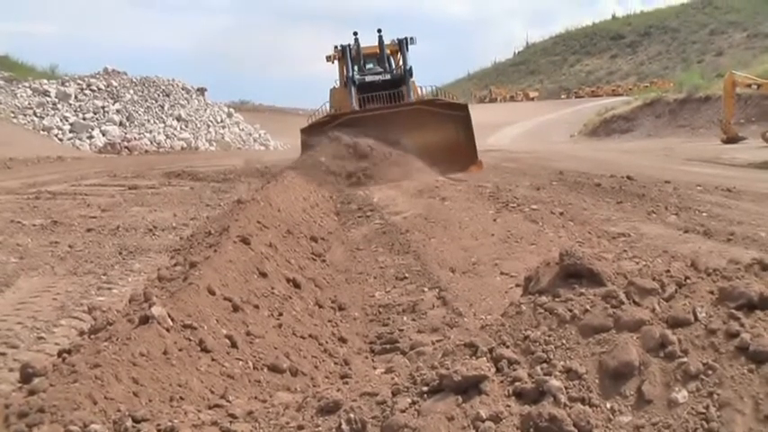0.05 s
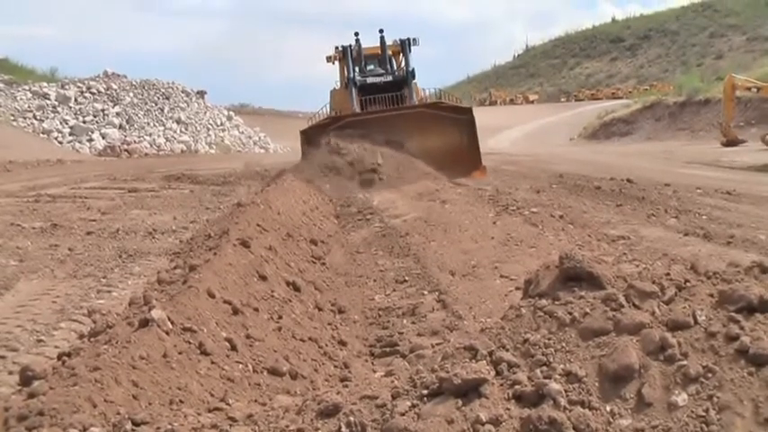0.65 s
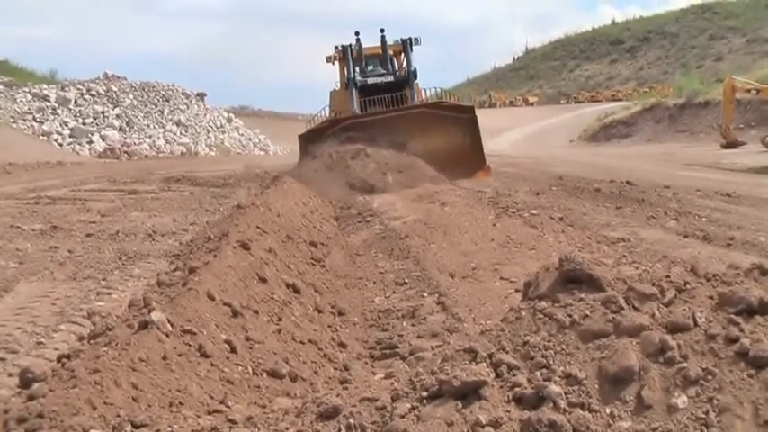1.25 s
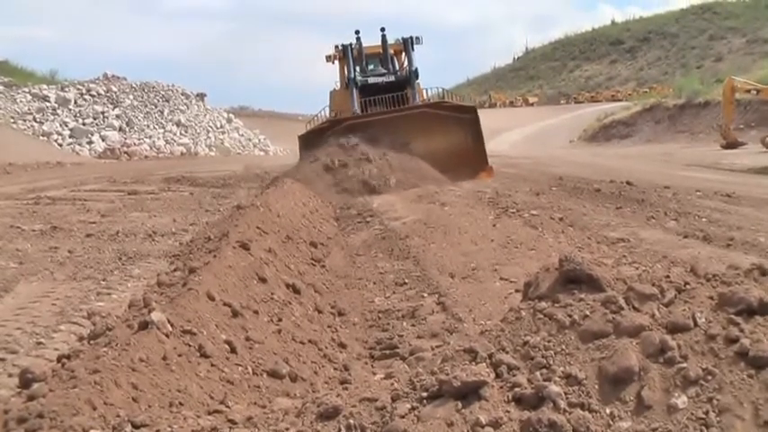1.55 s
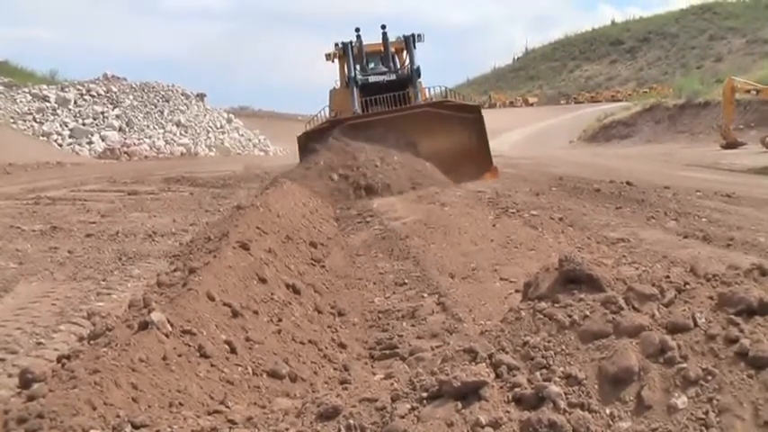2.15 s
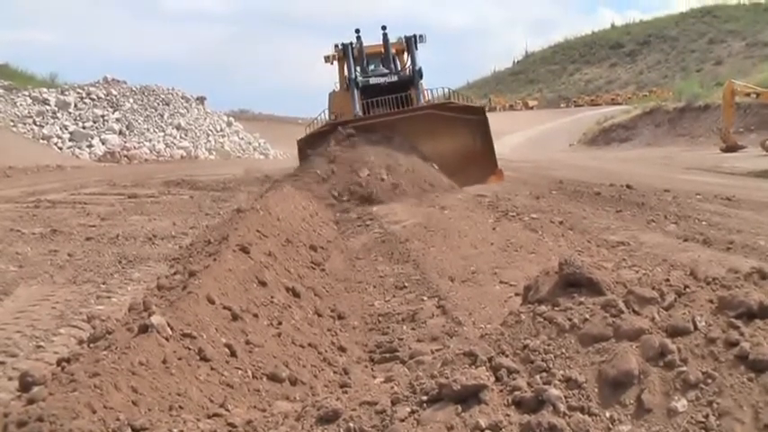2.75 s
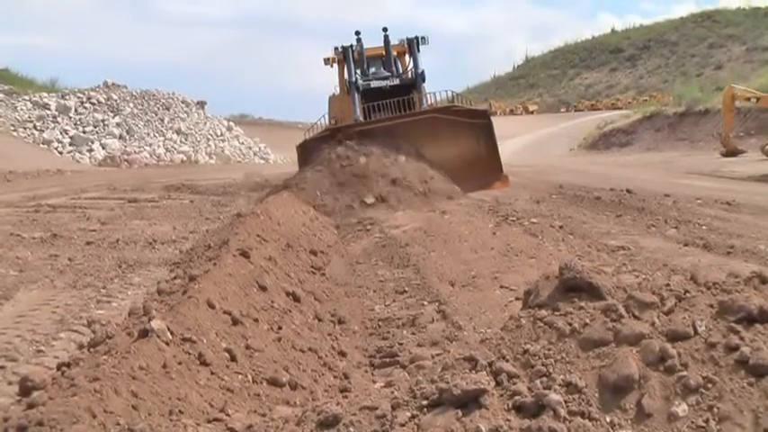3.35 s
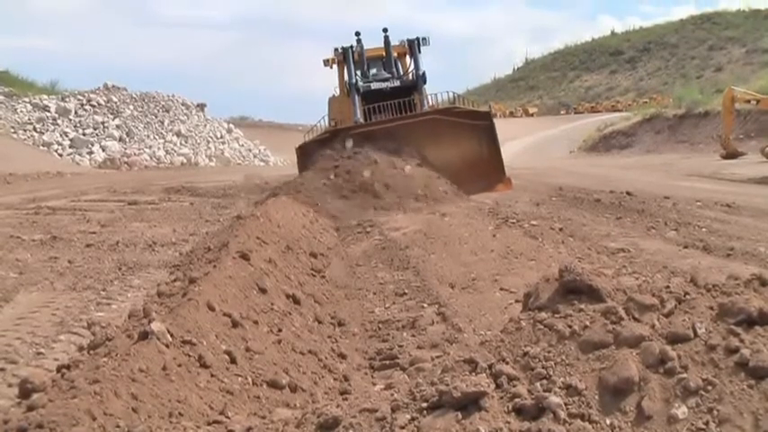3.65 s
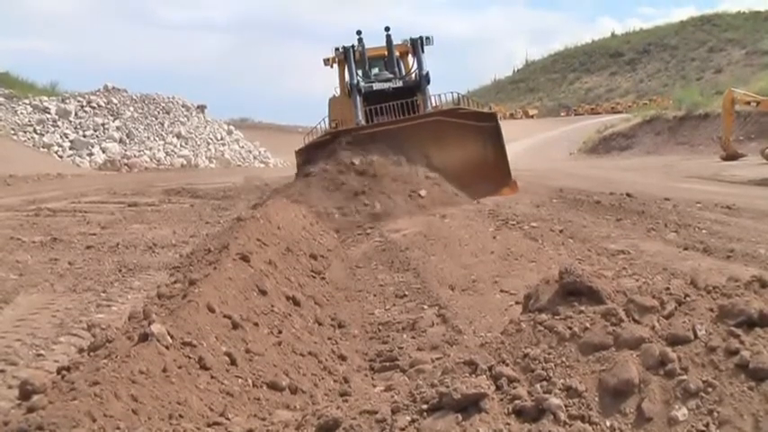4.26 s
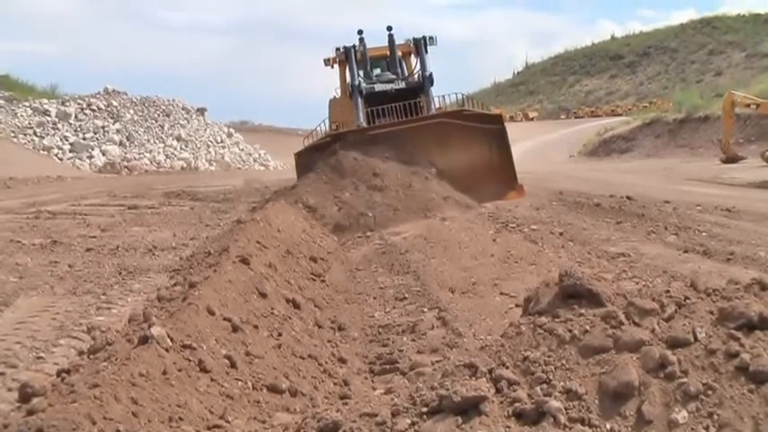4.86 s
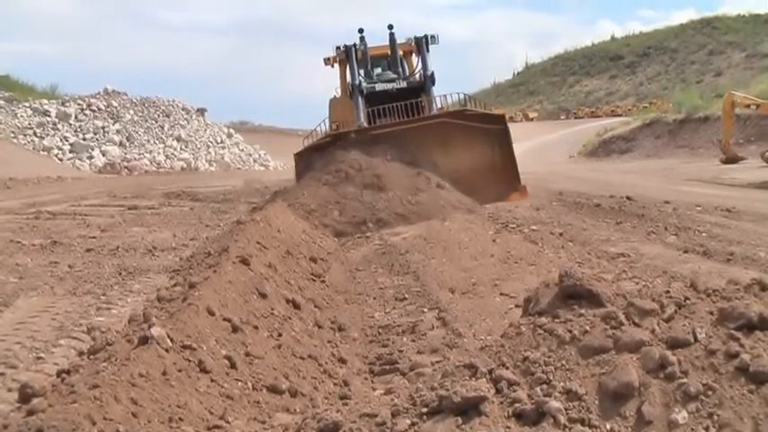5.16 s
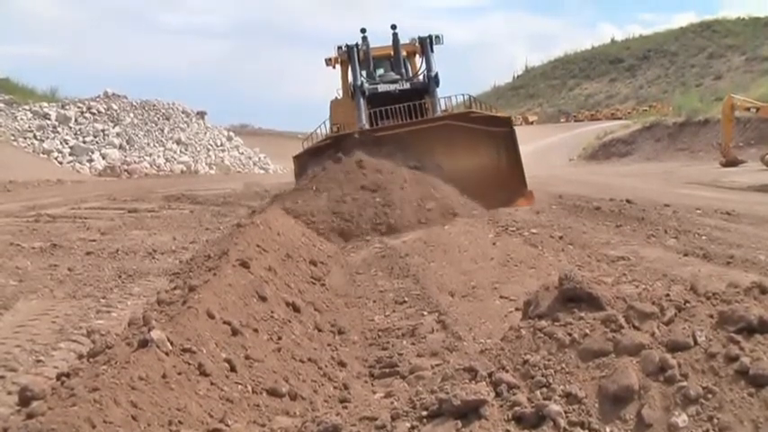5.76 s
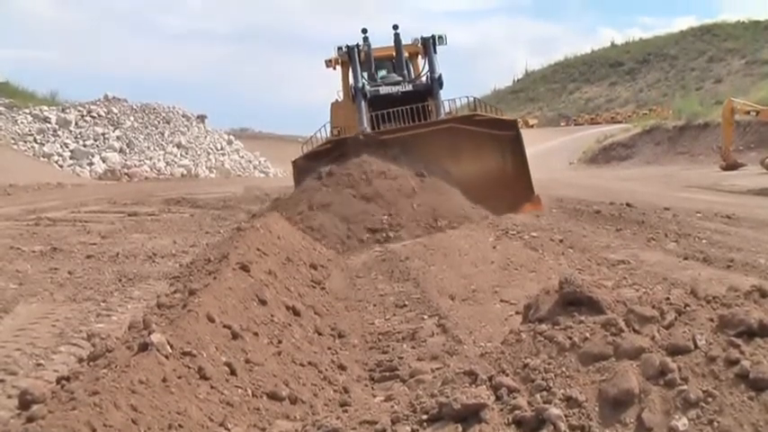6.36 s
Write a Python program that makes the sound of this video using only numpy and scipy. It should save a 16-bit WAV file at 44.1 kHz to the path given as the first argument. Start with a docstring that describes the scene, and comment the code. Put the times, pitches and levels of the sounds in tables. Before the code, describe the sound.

A bulldozer works outdoors, its diesel engine giving a throbbing roar with a fan hum and a faint, high turbo whistle that wavers slightly downward. Steel tracks rattle in quick surges while soil hisses and gravel crunches on the blade. The first second is loud and loaded, with track clanks and short stone knocks. From about 1 to 2.5 seconds, wind flutters and pops hollowly on the microphone and the machine recedes. More clanks come around 2.6 seconds, and the engine swells near 3 seconds with a brief steel ring. Gusts return just after 3 seconds and from about 3.7 to 4.8, over a weaker engine and scattered clanks and scrapes. From 5 to 5.9 seconds the engine is strong again, stones rasp along the blade and track pins squeak briefly. A last gust covers the machine from about 6 seconds.

```python
"""A crawler bulldozer's diesel drones as it pushes soil; its sound fades under the gusts and comes back
between them. Periodic firing gives a throbbing roar and harmonics; the fan hums, the turbo whistles.
Impacts excite the modes of the steel tracks, dry pins squeak, and soil and stones scrape and knock
on the blade. Gusts buffet the microphone, whose low cut leaves a hollow flutter of them."""
import sys
import numpy as np
from scipy import signal
from scipy.fft import rfft, irfft
from scipy.io import wavfile
from scipy.ndimage import uniform_filter1d

SR = 44100
rng = np.random.default_rng(int(sys.argv[2]) if len(sys.argv) > 2 else 0)


def generate_wav(sig):
    """Save sig (samples, or channels by samples) to the path in sys.argv[1] as 16-bit PCM at SR."""
    pcm = np.round(np.clip(np.atleast_2d(sig).T, -1, 1) * 32767).astype(np.int16)
    wavfile.write(sys.argv[1], SR, pcm)


N = 282240
TIME = np.arange(N) / SR

# spectrum of the engine's roar: (frequency [Hz], relative density [dB])
ROAR_SPECTRUM = [(30, -70), (50, -51), (70, -54), (100, -11), (200, -13), (320, -10), (480, 0.5),
                 (750, 1.5), (1100, -3), (1600, -2.5), (2150, -0.5), (2700, -6), (3500, -7), (4500, -24.5),
                 (7000, -69)]
# engine orders: (multiple of the firing rate [1], relative level [dB])
ENGINE_ORDERS = [(1, -24.5), (2, -11.5), (7, -13.5), (8, -6)]
# tones of the pumps and gears: (frequency [Hz], relative level [dB])
GEAR_TONES = [(633, -7), (1332, -14.5), (1454, -17), (1573, -21), (1708, -14.5)]
def diesel(load_db, fan_db, firing_hz=99.6, fan_hz=461, throb=0.064):
    """Periodic excitation: firing modulates a roar and sets up harmonics; fan, pumps and gears hum."""
    speed = 1 + 0.00314 * drift(2.06)
    pulsation = 1 + throb * np.cos(phase_of(firing_hz * speed))
    roar = colour(rng.standard_normal(N) * pulsation, ROAR_SPECTRUM) * from_db(drift(15))
    exhaust = band(roar, 460, 1350, order=1)   # load lifts the pipe's middle range
    loaded_roar = roar + (from_db(load_db) - 1) * exhaust
    partials = [(order * firing_hz, db) for order, db in ENGINE_ORDERS] + GEAR_TONES
    tones = 0
    for hz, db in partials:   # gusty air on the way makes each waver in level and phase
        tones += from_db(db + 4.5 * drift(7.1)) * np.sin(phase_of(hz * speed) + drift(7.4))
    fan = from_db(fan_db + 3.5 * drift(8.9)) * np.sin(phase_of(fan_hz * speed) + drift(11.7))
    return from_db(-0.97) * loaded_roar + from_db(-4.5) * tones + fan


# pitch of the turbocharger's whistle: (time [s], frequency [Hz])
WHISTLE_PITCH = [(0, 7130), (.18, 7150), (.35, 6990), (.55, 7030), (.77, 6715), (1.15, 6760), (1.45, 6910),
                 (2.42, 6820), (2.58, 6710), (3.25, 7000), (3.6, 6830), (3.85, 7000), (4.3, 6810),
                 (5.15, 6690), (5.71, 6715), (5.78, 6590), (6.4, 6520)]
# brief fades of the whistle: (time [s], gain [dB], duration [s])
WHISTLE_DIPS = [(2.38, -3, 0.17), (3.72, -3, 0.11), (4.15, -17, 0.057), (4.7, -3, 0.69)]
def turbo(treble_swing_db, intake_hz=6720, intake_width_hz=81):
    """Spectral broadening: turbulence smears the compressor's blade tone; an intake resonance lifts it."""
    hz, = in_time(WHISTLE_PITCH)
    core = from_db(-3 + 1.2 * drift(9.8)) * narrow_noise(hz, width_hz=31)
    rushing_air = from_db(-1.5) * narrow_noise(hz + 80, width_hz=290)
    resonance_db = 6.5 * bell(hz - intake_hz, intake_width_hz)
    level_db = -45.5 + 0.75 * treble_swing_db + swells(WHISTLE_DIPS) + resonance_db
    return from_db(level_db) * (core + rushing_air)


# resonances of the steel undercarriage: (frequency [Hz], bandwidth [Hz], gain [dB])
STEEL_MODES = [(921, 44, 5.5), (1150, 90, 0.5), (1520, 250, -2), (1990, 110, 3), (2150, 75, 4),
               (2610, 640, -2), (3200, 830, -5), (5450, 810, -19)]
def rattle(hits_per_s=450, shoe_hz=3.8, first_shoe_s=0.225):
    """Impact excitation: pins, rollers and stones hit the tracks, surging as shoes pass the sprocket."""
    surge = from_db(8.5 * np.cos(2 * np.pi * shoe_hz * (TIME - first_shoe_s)))
    return rms_one(resonate(ticks(hits_per_s * surge, spread_db=6), STEEL_MODES))


# track shoes slapping down:
# (time [s], relative level [dB], chatter T60 [s], centre frequency [Hz], ring level [dB])
SHOE_IMPACTS = [(0.163, -11.5, 0.55, 1450, -28), (.362, -20, 0.29, 2300, -29),
                (0.51, -18, 0.079, 1500, -32), (.648, -16, 0.79, 805, -14), (0.751, -12, 0.27, 2600, -66),
                (0.857, -15.5, 0.13, 2000, -44), (0.928, -17.5, 0.35, 2010, -33),
                (1.234, -19, .25, 1900, -34), (1.496, -24, 0.23, 2800, -52), (1.012, -15, 0.18, 1400, -36),
                (2.577, -23.5, 0.28, 2900, -56), (2.649, -21, 0.19, 2150, -35),
                (2.709, -12.5, 0.093, 2800, -31.5), (2.729, -17, 0.21, 2800, -35),
                (3.422, -26, 0.31, 2540, -31.5), (3.652, -17.5, .16, 2070, -47), (3.67, -24, .1, 1800, -50),
                (3.904, -24, 0.4, 1800, -42), (4.633, -24.5, 0.16, 1910, -40), (5.25, -26, .15, 1500, -40)]
def clanks(crack_t60_s=0.075, pin_hits_per_s=470):
    """Impact transients: a shoe lands with a crack, and its chatter drives the undercarriage's modes."""
    force, cracks = np.zeros((2, N + SR))
    age = TIME[:SR // 2]
    for start, db, chatter_t60, centre_hz, _ in SHOE_IMPACTS:
        span = slice(int(start * SR), int(start * SR) + len(age))
        force[span] += from_db(db - 60 * age / chatter_t60)
        crack = rms_one(band(rng.standard_normal(len(age)), centre_hz / 2, centre_hz * 1.32))
        cracks[span] += from_db(db - 7.5 - 60 * age / crack_t60_s) * crack
    contact = rms_one(rng.standard_normal(N) + 0.19 * rms_one(ticks(pin_hits_per_s, spread_db=-13)))
    smooth_force = uniform_filter1d(force[:N], size=130)
    chatter = from_db(4) * resonate(smooth_force * contact, STEEL_MODES)
    return band(chatter + cracks[:N], 420, 3800)


# modes of one shoe: (frequency [Hz], relative level [dB])
SHOE_MODES = [(810, -2.5), (1340, 1), (1590, 4), (1870, 5), (2030, 4), (2570, 2), (2710, -1), (3330, 0)]
def shoe_rings(t60_s=0.3, span_octaves=1, detune=0.0037):
    """Free vibration: a landed shoe rings on, and the point of impact selects which modes speak."""
    out, age = np.zeros(N + SR), TIME[:SR // 2]
    decay = from_db(-60 * age / t60_s)
    for start, _, _, centre_hz, ring_db in SHOE_IMPACTS:
        for hz, db in SHOE_MODES:
            mistuning, scatter_db = rng.standard_normal(2)   # no two shoes ring quite alike
            gain = from_db(ring_db + db + scatter_db) * bell(np.log2(hz / centre_hz), span_octaves)
            mode = np.sin(2 * np.pi * hz * (1 + detune * mistuning) * age)
            out[int(start * SR):][:len(age)] += gain * decay * mode
    return out[:N]


# rises of the links' steel note: (time [s], gain [dB], duration [s])
LINK_RISES = [(.15, 6, .3), (2.77, 8, .1), (2.91, 16, .06), (3.08, 7, .04)]
def links(roar_swing_db, note_hz=2177, wander_hz=35):
    """Sustained resonance: rolling links keep a steel note ringing, unsteady in pitch and strength."""
    level_db = -45 + 0.55 * roar_swing_db + swells(LINK_RISES) + 1.5 * drift(10)
    return from_db(level_db) * narrow_noise(note_hz + wander_hz * drift(10), width_hz=56)


# squeals of the track pins: (time [s], frequency [Hz], level [dB], duration [s], pitch quaver [fraction])
PIN_SQUEALS = [(1.005, 8300, -39, .018, .005), (5.443, 5208, -29.5, .029, .001),
               (5.8, 4820, -38.5, .02, .035), (5.945, 5208, -45, .038, .002)]
def squeaks():
    """Friction-induced vibration: a dry pin sings for a moment, purely or with a rough quaver."""
    quaver = drift(250)
    return sum(from_db(db) * bell(TIME - at, length) * np.sin(phase_of(hz * (1 + depth * quaver)))
               for at, hz, db, length, depth in PIN_SQUEALS)


# spectrum of sliding grit: (frequency [Hz], relative density [dB])
GRIT_SPECTRUM = [(2000, -45), (3500, 4), (4500, 1), (6000, -0.5), (7500, -1.5), (8800, -8.5), (10200, -7),
                 (11500, -27.5), (14000, -101)]
def soil(treble_db):
    """Sliding friction: soil and grit hiss up the blade in uneven surges."""
    grit = colour(rng.standard_normal(N) * from_db(0.82 * drift(140)), GRIT_SPECTRUM)
    return from_db(treble_db + 1 + 1.77 * drift(6.7)) * grit


def gravel():
    """Granular collisions: gravel crunches in clumps as the blade rolls it over."""
    crunch = ticks(per_s=1100, spread_db=3) * from_db(4.5 * drift(14))
    return from_db(-7.5) * rms_one(band(crunch, 1400, 3400))


# scrapes of the blade's edge: (time [s], level [dB], duration [s], lower edge [Hz], upper edge [Hz])
EDGE_SCRAPES = [(0.744, -29.5, 0.033, 3050, 7840), (1.548, -40, .094, 2400, 7100),
                (2.554, -43.5, 0.084, 3000, 8440), (2.606, -29, 0.024, 700, 2400),
                (3.302, -36.5, 0.14, 1900, 4550), (3.5, -31.5, .1, 1580, 3430),
                (4.433, -39, 0.11, 1710, 3400), (4.777, -40, .06, 1700, 3940),
                (5.165, -30, 0.11, 1690, 3770), (5.25, -32, 0.071, 990, 2600),
                (5.44, -32.5, 0.094, 2000, 3750), (5.756, -28.5, 0.085, 784, 2170),
                (5.794, -41, .067, 3000, 8400), (5.901, -31.5, 0.049, 1300, 3470)]
def rasps(slips_per_s=1500, judder_db=2.5):
    """Stick-slip: stones grind along the edge in a stream of tiny slips, lower for larger stones."""
    slips = ticks(slips_per_s, spread_db=-0.5) * from_db(judder_db * drift(30))
    return sum(from_db(db) * bell(TIME - at, length) * rms_one(band(slips, low_hz, high_hz))
               for at, db, length, low_hz, high_hz in EDGE_SCRAPES)


# stones striking the hollow blade: (time [s], frequency [Hz], peak level [dB])
STONE_IMPACTS = [(.088, 640, -15), (.224, 1180, -16), (.277, 700, -12), (.39, 650, -14), (.415, 980, -12),
                 (.507, 985, -11), (.586, 790, -17), (.755, 680, -12), (.798, 930, -17), (1.011, 950, -14)]
def knocks(t60_s=0.08):
    """Damped oscillation: each stone rings one short note of the blade, with nothing below 400 Hz."""
    out = np.zeros(N)
    for start, hz, db in STONE_IMPACTS:
        age = np.maximum(TIME - start, 0)
        out += from_db(db - 60 * age / t60_s) * np.sin(2 * np.pi * hz * age)
    return low_cut(out, 400)


# spectrum of wind on the microphone: (frequency [Hz], relative density [dB])
WIND_SPECTRUM = [(15, -62), (30, -60), (60, -91), (110, -21.5), (180, -15), (260, -6), (350, -1), (470, 0),
                 (620, -4), (800, -10.5), (1100, -24.5), (1600, -33.5), (3000, -34), (8000, -62)]
def wind(lull_db=-4.2, lull_s=0.05):
    """Turbulent pressure: eddies flutter and pop on the microphone, easing around each strong buffet."""
    air = from_db(3 * drift(36)) * colour(rng.standard_normal(N), WIND_SPECTRUM)
    pops = resonate(ticks(per_s=110, spread_db=-4.5), [(455, 610, 0)])
    pops = from_db(-4.5) * rms_one(band(pops, 173, 754))
    lull = np.minimum(sum(bell(TIME - at, lull_s) for at, *_ in STRONG_EDDIES), 1)
    flutter = wind_strength() * from_db(lull_db * lull) * (air + pops)
    return low_cut(flutter + buffets(), 60, order=4)


# the strongest buffets: (time [s], level [dB], duration [s], centre frequency [Hz])
STRONG_EDDIES = [(0.897, -12.5, 0.0092, 425), (1.078, -9.5, 0.021, 523), (1.244, -12.5, 0.0055, 605),
                 (1.337, -16.5, 0.01, 525), (1.387, -16.5, 0.012, 467), (1.427, -16.5, 0.0075, 554),
                 (1.452, -14.5, 0.022, 520), (1.518, -17.5, 0.022, 534), (1.565, -15, 0.016, 570),
                 (1.581, -9, 0.01, 480), (1.606, -15, 0.011, 538), (1.657, -18, 0.0099, 402),
                 (1.663, -11.5, 0.0052, 449), (1.712, -18, .014, 430), (1.73, -20.5, .01, 456),
                 (1.753, -18, 0.01, 420), (1.767, -20.5, 0.023, 450), (1.804, -18, 0.0091, 460),
                 (1.973, -20.5, .014, 440), (2.038, -19, 0.011, 485), (2.144, -19.5, 0.015, 470),
                 (2.193, -17, 0.04, 508), (2.225, -14.5, 0.0074, 503), (2.342, -21.5, 0.0094, 483),
                 (2.383, -18, 0.0086, 534), (2.402, -20.5, 0.015, 450), (2.437, -22, 0.044, 520),
                 (3.092, -18, 0.0093, 464), (3.139, -12, 0.013, 549), (3.16, -12, .014, 495),
                 (3.179, -14.5, .012, 510), (3.236, -14, 0.0083, 490), (3.653, -23.5, 0.019, 400),
                 (3.698, -20.5, .011, 465), (3.728, -17.5, 0.0063, 580), (3.762, -13, 0.01, 440),
                 (3.805, -21.5, .018, 380), (3.922, -16, .008, 460), (3.941, -17, 0.014, 446),
                 (3.971, -18.5, 0.0078, 550), (3.998, -17.5, 0.025, 491), (4.108, -16, 0.014, 568),
                 (4.2, -22, 0.0097, 520), (4.235, -18, 0.014, 544), (4.258, -21, 0.014, 640),
                 (4.283, -18, .008, 460), (4.314, -20.5, 0.009, 455), (4.461, -24, 0.015, 502),
                 (4.51, -15, 0.0093, 516), (4.556, -21.5, 0.028, 453), (4.59, -20, 0.0075, 450),
                 (4.631, -19.5, 0.0064, 490), (4.688, -18.5, 0.0054, 476), (4.709, -18.5, 0.0095, 430),
                 (4.754, -22.5, 0.0072, 474), (5.091, -19, .012, 463), (5.924, -20, .026, 470),
                 (5.997, -21, 0.017, 477), (6.045, -18, 0.011, 477), (6.072, -17.5, 0.018, 448),
                 (6.133, -18, 0.027, 477), (6.179, -18, 0.024, 493), (6.32, -15.5, 0.017, 493)]
def buffets(swirl_hz=480):
    """Convected eddies: each swells steeply and dies away; faster passage raises its hollow note."""
    swirl = colour(rng.standard_normal(N), WIND_SPECTRUM)
    local_power = uniform_filter1d(swirl ** 2, size=220)
    swirl = band(swirl / local_power ** 0.35, 176, 2600)   # partly evens out the level
    out = np.zeros(N)
    for at, db, length, hz in STRONG_EDDIES:
        span = slice(*np.searchsorted(TIME, [at - length, at + 3 * length]))
        age = TIME[span] - at
        envelope = bell(age, length * np.where(age < 0, 0.5, 1.5))
        eddy = envelope * np.interp(at + age * hz / swirl_hz, TIME, swirl)
        out[span] += from_db(db) * np.sqrt(np.mean(envelope ** 2)) * rms_one(eddy)
    return out


# gusts at the microphone: (start [s], end [s], level [dB])
WIND_GUSTS = [(1.36, 1.606, -21), (1.962, 2.03, -22.5), (2.138, 2.512, -25), (3.123, 3.207, -21),
              (3.675, 3.765, -22.5), (3.96, 4.198, -25.5), (4.51, 4.866, -33), (5.863, 6.403, -25)]
def wind_strength(breeze_db=-37, breeze_rise_s=0.67, attack_s=0.056, release_s=0.16, sag_db_per_s=2.5):
    """Power summation: a breeze gets up, and each gust rises out of it, sags and dies away."""
    strength = from_db(breeze_db) * np.minimum(TIME / breeze_rise_s, 1) ** 2
    for start, end, db in WIND_GUSTS:
        edges = np.maximum(start - TIME, 0) / attack_s + np.maximum(TIME - end, 0) / release_s
        gust = from_db(db - sag_db_per_s * np.maximum(TIME - start, 0)) * np.exp(-edges)
        strength = np.hypot(strength, gust)
    return strength


def from_db(db):
    """Decibels to amplitude ratio."""
    return 10 ** (np.asarray(db) / 20)


def rms_one(x):
    """Normalisation to rms 1."""
    return x / np.sqrt(np.mean(x ** 2) + 1e-20)


def in_time(rows):
    """Linear interpolation of each column of a curve at every sample."""
    times, *columns = np.transpose(rows)
    return [np.interp(TIME, times, column) for column in columns]


def bell(offset, width):
    """Gaussian around offset 0, `width` wide at half height."""
    return 0.5 ** np.minimum((2 * offset / width) ** 2, 60)


def swells(rows):
    """Superposed Gaussian rises and dips in level, dB at every sample."""
    return sum(db * bell(TIME - at, length) for at, db, length in rows)


def drift(rate):
    """Low-pass noise of rms 1 that changes about `rate` times a second."""
    step, settle = 20, 4000
    pole = np.exp(-2 * np.pi * rate * step / SR)
    noise = rng.standard_normal(N // step + settle + 2)
    slow = signal.lfilter([1], [1, -2 * pole, pole * pole], noise)[settle:]
    return np.interp(np.arange(N) / step, np.arange(len(slow)), rms_one(slow))


def ticks(per_s, spread_db):
    """Poisson impulses of either sign; a few are much larger (spread > 0) or smaller (spread < 0)."""
    impulses = (rng.random(N) < per_s / SR) * rng.choice([-1, 1], N)
    return impulses * from_db(spread_db * np.minimum(rng.exponential(1, N), 3))


def phase_of(hz):
    """Phase as the running integral of frequency."""
    return 2 * np.pi * np.cumsum(hz) / SR


def narrow_noise(hz, width_hz):
    """Quadrature modulation: narrowband noise around a moving frequency; rms 1."""
    phase = phase_of(hz)
    return drift(width_hz) * np.cos(phase) + drift(width_hz) * np.sin(phase)


def colour(x, spectrum):
    """Spectral shaping by a smooth curve; rms 1."""
    hz, db = np.transpose(spectrum)
    bins = np.maximum(np.fft.rfftfreq(N, 1 / SR), 1)
    gain = from_db(np.interp(np.log(bins), np.log(hz), db))
    return rms_one(irfft(rfft(x) * gain, N))


def resonate(x, modes):
    """Modal superposition: parallel resonators with alternating signs."""
    out = 0
    for k, (hz, width_hz, db) in enumerate(modes):
        radius = np.exp(-np.pi * width_hz / SR)
        poles = [1, -2 * radius * np.cos(2 * np.pi * hz / SR), radius ** 2]
        gain = (-1) ** k * from_db(db) * (1 - radius ** 2) / 2
        out += gain * signal.lfilter([1, 0, -1], poles, x + 1e-18)
    return out


def band(x, low_hz, high_hz, order=2):
    """Band-pass filtering between two frequencies."""
    return signal.sosfilt(signal.butter(order, [low_hz, high_hz], "band", fs=SR, output="sos"), x)


def low_cut(x, hz, order=2):
    """High-pass filtering above a frequency."""
    return signal.sosfilt(signal.butter(order, hz, "high", fs=SR, output="sos"), x)


# how strongly the machine comes through: (time [s], roar level [dB], treble level [dB])
MACHINE_LEVELS = [(0, -28.5, -34), (1.03, -28.5, -37), (1.12, -34.5, -46.5), (1.25, -28, -38),
                  (1.42, -38, -44.5), (1.74, -43, -51.5), (1.97, -35.5, -47.5), (2.27, -38.5, -47.5),
                  (2.5, -36, -50), (2.7, -33.5, -51), (2.9, -27.5, -41), (3.07, -27.5, -37),
                  (3.16, -36, -43.5), (3.3, -31, -43), (3.8, -35.5, -47.5), (4.2, -39, -50.5),
                  (4.85, -34.5, -50.5), (5.15, -29, -44), (5.79, -27, -42), (6.02, -39.5, -46.5),
                  (6.4, -35.5, -51.5)]
# engine load, which thickens the exhaust: (time [s], midrange gain [dB])
ENGINE_LOAD = [(0, 13.5), (.9, 13), (2.6, 0), (3.5, 1), (4.4, -5), (5.6, 1.5), (6.4, 3)]
# rises of the fan's hum: (time [s], gain [dB], duration [s])
FAN_RISES = [(.07, 7, 0.1), (4.83, 11, 0.08), (5.3, 9, 0.11), (5.5, 7, .17)]
def scene():
    """Superposition: engine, tracks and blade ahead, and wind at the microphone, in one channel."""
    roar_db, treble_db = in_time(MACHINE_LEVELS)
    load_db, = in_time(ENGINE_LOAD)
    roar_swing_db = roar_db - roar_db.mean()
    fan_db = -4 - 0.33 * roar_swing_db + swells(FAN_RISES)   # relative to the roar; swings less than it
    machine = from_db(roar_db) * (diesel(load_db, fan_db) + from_db(-8.5) * rattle())
    tracks = links(roar_swing_db) + clanks() + shoe_rings() + squeaks()
    blade = soil(treble_db) + from_db(roar_db) * gravel() + rasps() + knocks()
    whistle = turbo(treble_db - treble_db.mean())
    return (machine + tracks + blade + whistle + wind())[None]


def record(dry):
    """Band limiting and saturation: the microphone drops the bass, rounds the peaks and cuts the top."""
    low_cut_hz, high_cut_hz, ceiling = 100, 12000, 0.54
    thin = low_cut(dry, low_cut_hz)
    limited = thin / (1 + (thin / ceiling) ** 10) ** (1 / 10)
    return signal.sosfilt(signal.ellip(10, 0.3, 80, high_cut_hz, fs=SR, output="sos"), limited)


dry = scene()
out = record(dry)
generate_wav(out)
```